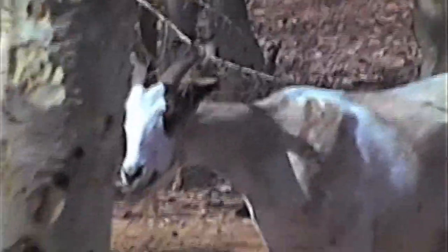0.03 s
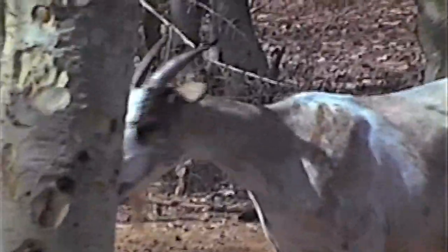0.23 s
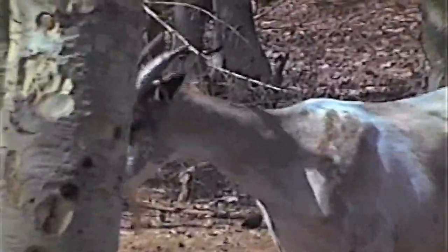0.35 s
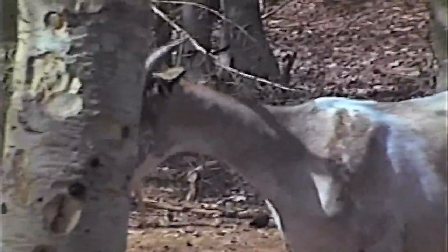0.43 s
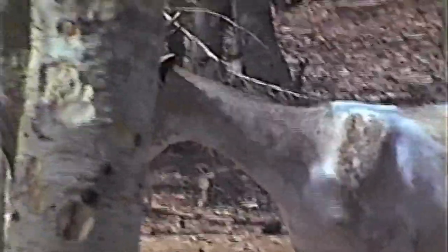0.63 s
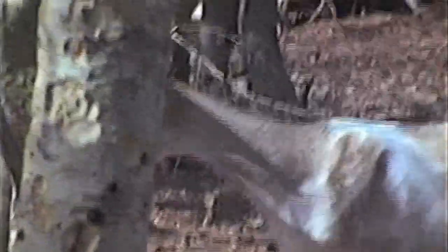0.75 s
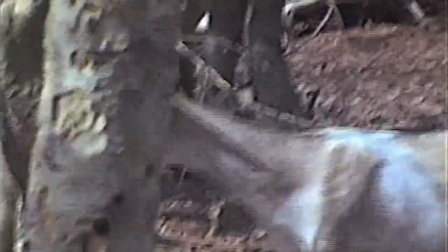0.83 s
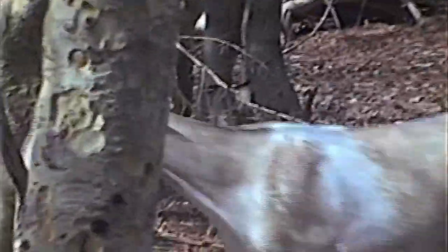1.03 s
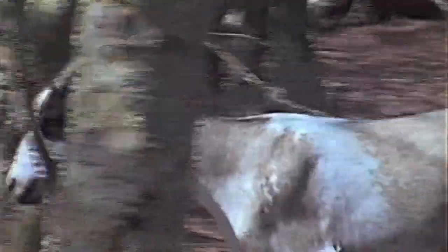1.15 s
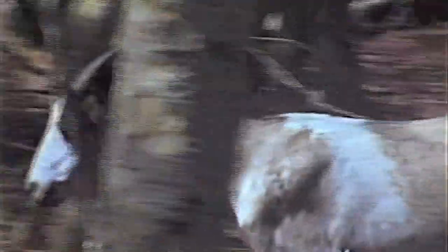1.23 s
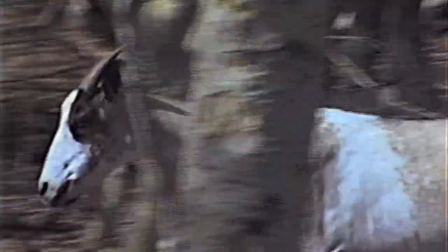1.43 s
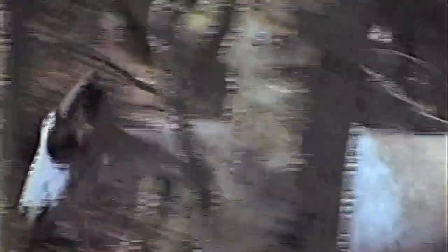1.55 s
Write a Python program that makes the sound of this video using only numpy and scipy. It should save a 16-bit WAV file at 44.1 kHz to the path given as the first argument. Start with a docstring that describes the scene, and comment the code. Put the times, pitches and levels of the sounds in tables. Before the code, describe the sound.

A goat gives one quavering, raspy bleat from about 0.1 to 0.8 seconds, in seven pulsing throbs with creaks between, loudest around 0.45 to 0.6, lightly echoed by trunks and ground. Two tiny dry leaf ticks precede it at 0.03. Soft outdoor air, high insect chirps and a faint rasping trill run throughout; low electrical hum and thin hiss cut out just after 1.0.

```python
"""Faint outdoor air, chirping and rasping insects and a low electrical hum are there from the start.
Two dry leaf ticks come first, then a goat gives one quavering bleat among trees: seven throbs of sharp
vocal pulses with creaks between them. Each throb swells and sags in loudness and pitch together,
while over the whole bleat the mouth opens and shuts once; nearby trunks and ground echo it.
Just after one second the hum and its thin hiss cut out, leaving the air and the insects."""
import sys
import numpy as np
from scipy import signal
from scipy.fft import rfft, irfft
from scipy.io import wavfile

SR = 44100
rng = np.random.default_rng(int(sys.argv[2]) if len(sys.argv) > 2 else 0)


def wav_record(signal):
    """Record a signal, one row per channel, as 16-bit PCM in the file named by sys.argv[1]."""
    frames = np.transpose(np.atleast_2d(signal))
    bounded = np.clip(frames, -1, 1)
    # unit amplitude maps onto the largest positive 16-bit level
    quanta = np.round(bounded * 32767).astype(np.int16)
    wavfile.write(sys.argv[1], SR, quanta)


N = 70560  # samples, 1.6 s
EDGE_HZ = 10900  # upper band limit


def amp(db):
    """Decibels to gain."""
    return 10 ** (np.asarray(db) / 20)


def unit(x):
    """Scales to rms 1."""
    return x / np.sqrt(np.mean(x ** 2) + 1e-20)


def read(points, hz):
    """Reads a table on a log-frequency axis."""
    f, value = np.transpose(points)
    return np.interp(np.log(hz + 1), np.log(f + 1), value)


def add(mix, s, sound):
    """Mixes a sound in at time s, in seconds."""
    part = mix[max(round(s * SR), 0):][:len(sound)]
    part += sound[:len(part)]


def spread(mid, side):
    """Middle and side to left and right."""
    return np.array([mid + side, mid - side])


def noise(colour_db):
    """Noise of rms 1 with a spectrum given as a function of Hz."""
    spectrum = rfft(rng.standard_normal(N))
    return unit(irfft(spectrum * amp(colour_db(np.fft.rfftfreq(N, 1 / SR))), N))


def ring(colour_db, size=1024):
    """Causal minimum-phase response of energy 1 with the given spectrum."""
    log_gain = np.log(amp(colour_db(np.fft.rfftfreq(size, 1 / SR))))
    circle = np.r_[log_gain, log_gain[-2:0:-1]]
    out = np.fft.ifft(np.exp(np.conj(signal.hilbert(circle)))).real
    return out / np.linalg.norm(out)


def hum(left_db=2.0, right_db=-9.5, fade_s=0.0033):
    """Mains hum, a sine stronger on the left, and a thin centred hiss that cut out together."""
    hum_hz, hum_db, hiss_db, end_s = 50.1, -63.5, -67, 1.025
    # colour of the electrical hiss: hz, relative level_db
    hiss_colour = [(30, 22), (100, 6), (200, 8), (500, -2), (5000, -4.5), (9300, -11), (10800, -37)]
    t = np.arange(N) / SR
    sides = amp([[left_db], [right_db]])
    tone = amp(hum_db) * sides * np.sqrt(2) * np.sin(2 * np.pi * hum_hz * t)
    hiss = amp(hiss_db) * noise(lambda hz: read(hiss_colour, hz))
    return (tone + hiss) * np.clip((end_s - t) / fade_s, 0, 1)


def air(air_db=-57):
    """Soft steady outdoor hiss: separate coloured noises for the middle and the sides."""
    # colour of the air: hz, relative level_db
    air_colour = [(30, -52), (100, -20), (170, -18), (240, -4.5), (450, -2.5), (700, -1), (1000, -3),
                  (1550, -6.5), (1850, 0.5), (2250, -6.5), (3300, -12), (4300, -2.5), (4750, -0.5),
                  (5200, -14), (5900, -21.5), (6800, -27), (7500, -54), (11000, -50)]
    # stereo width of the air: hz, side_minus_middle_db
    air_width = [(60, 1), (220, -7), (810, -6), (2990, -2), (11000, -1.5)]
    mid, side = (noise(lambda hz: read(air_colour, hz)) for _ in range(2))
    side = irfft(rfft(side) * amp(read(air_width, np.fft.rfftfreq(N, 1 / SR))), N)
    return amp(air_db) * spread(mid, side)


def insects():
    """Short chirps that bend downward, over a distant rasping trill of quick downward strokes."""
    # chirps of a high insect, about ten a second with one longer gap: centre_s, peak_level_db
    chirp_table = [(0.087, -48), (0.183, -49.5), (0.282, -60), (0.378, -46), (0.769, -51.5), (0.867, -49.5),
                   (0.969, -51.5), (1.065, -54.5), (1.163, -55), (1.261, -60), (1.357, -50.5), (1.451, -51),
                   (1.551, -52)]
    # pitch at the centre; fall and bend are per width and per width squared
    chirp_hz, chirp_slide_hz, chirp_bend_hz, chirp_width_s = 5494, 55, 49.1, 0.0063
    trill_hz, trill_sweep_hz, trill_width_hz = 4440, 234, 67
    strokes_per_s, trill_db = 49, -63

    t = np.arange(N) / SR
    chirps = np.zeros(N)
    for s, db in chirp_table:
        u = (t - s) / chirp_width_s
        hz = chirp_hz - chirp_slide_hz * u - chirp_bend_hz * u ** 2
        chirps += amp(db) * np.exp(-u ** 2 / 2) * np.sin(2 * np.pi * np.cumsum(hz) / SR)

    stroke = t * strokes_per_s % 1
    stroke_hz = trill_hz + trill_sweep_hz * (1 - 2 * stroke)
    # slow noise smears each stroke into a narrow band
    blur = noise(lambda f: -20 * np.log10(1 + (f / trill_width_hz) ** 2))
    trill = np.sin(np.pi * stroke) * blur * np.sin(2 * np.pi * np.cumsum(stroke_hz) / SR)
    return chirps + amp(trill_db) * unit(trill)


def trees(x, wood_db=-18, side_db=-2, size=256):
    """A few close echoes from ground and nearby trunks, then a faint scattered tail."""
    # echoes: delay_s, level_db, side (-1 to 1)
    echoes = [(.0013, -42, 0.16), (.0021, -18, -.15), (.0057, -16, .3)]
    # ring of the trees: hz, t60_s
    wood_ring = [(200, 0.1), (1000, 0.19), (4000, 0.17), (10000, 0.54)]
    near, wide = x.copy(), np.zeros(N)
    for delay, db, pan in echoes:
        add(near, delay, amp(db) * x)
        add(wide, delay, pan * amp(db) * x)

    # half a second of noise, each band dying at its own rate
    hz, t, z = signal.stft(rng.standard_normal((2, SR // 2)), SR, nperseg=size)
    decay = amp(-60 * t / read(wood_ring, hz)[:, None])
    tail = signal.istft(z * decay, SR, nperseg=size)[1]
    mid, side = signal.fftconvolve(x[None], tail / np.linalg.norm(tail[0]), axes=1)[:, :N]
    return spread(near, wide) + amp(wood_db) * spread(mid, amp(side_db) * side)


def leaves(decay_s=0.0012, size=256):
    """Tiny crackles of dry litter: noise bursts that die within milliseconds."""
    # leaf ticks: start_s, level_db (before halving)
    tick_table = [(.027, -55.5), (0.032, -45)]
    # colour of a tick: hz, relative level_db
    leaf_colour = [(1500, -28), (4000, -14), (7500, 14), (10000, -1)]
    out = np.zeros(N)
    for s, db in tick_table:
        crack = rng.standard_normal(size) * np.exp(-np.arange(size) / SR / decay_s)
        add(out, s, amp(db) * np.convolve(crack, ring(lambda hz: read(leaf_colour, hz))) / 2)
    return out


def pulse(s, weak_db, breath, count=24, size=256):
    """One snap of the vocal folds and its puff of air ring the throat."""
    # throat and mouth at each stage: hz, relative level_db
    shut, opening = [(120, -29.5), (240, 10.5), (900, 9.5), (1400, 5.5), (2200, 1.5), (4000, -1.5),
                     (6500, -26), (9500, -16.5), (11000, -45)], [(150, -18), (290, -5), (600, -20), (1000, -7.5), (1450, 3), (1850, -19),
                                   (2400, 5), (2750, -8), (3200, 5.5), (3600, -3), (4000, -2.5),
                                   (4600, -4.5), (5400, -27), (6100, -21.5), (7200, -33), (9500, -31),
                                   (11000, -61)]
    wide_open, closing = [(150, -44.5), (280, -9), (520, -15), (950, -7), (1450, -6), (1750, -8),
                          (2150, -8.5), (2520, 2.5), (2800, 1), (3120, 3), (3500, -3), (4100, 0),
                          (4900, -11.5), (5500, -23), (6200, -26), (7500, -43), (9500, -30.5), (11000, -55)], [(140, -35), (250, -3), (520, -12), (900, 5), (1280, -6), (1520, 3),
                                        (2000, -5.5), (2450, 2), (3050, 3.5), (3600, -1.5), (4600, 0.5),
                                        (5150, -4), (5650, -14), (6300, -13.5), (7000, -21.5), (9500, -21),
                                        (11000, -60)]
    # the mouth opens and shuts once: time_s, stage (0 shut, 1 opening, 2 wide, 3 closing, 4 shut)
    mouth_path = [(.13, 0), (.15, 1), (.37, 1.15), (.44, 1.9), (.6, 2.15), (.64, 3), (.73, 3), (.75, 4)]
    # balance of weak pulses, brighter around 7 kHz: hz, db_per_db_of_weakness
    weak_balance = [(100, 1.08), (500, 0.9), (1500, 1.07), (4000, 1), (7000, 1.87), (10000, 1.05)]
    # colour of the puff: hz, relative level_db
    breath_colour = [(200, -26), (900, -18), (2000, -9), (3300, -2), (5000, 1), (8000, 1)]
    puff_s, ripple_db = .004, .5  # decay of the puff; random change of colour per pulse

    shapes = [shut, opening, wide_open, closing, shut]
    stage = np.interp(s, *np.transpose(mouth_path))
    shares = np.maximum(1 - abs(stage - np.arange(len(shapes))), 0)
    ripple = np.c_[np.linspace(0, EDGE_HZ, count), ripple_db * rng.standard_normal(count)]

    def throat_db(hz):
        """Blend of the two nearest mouth shapes, brightened by weakness and rippled."""
        mouth = sum(share * read(shape, hz) for share, shape in zip(shares, shapes))
        return mouth + weak_db * read(weak_balance, hz) + read(ripple, hz)

    throat = ring(throat_db)
    puff = rng.standard_normal(size) * np.exp(-np.arange(size) / SR / puff_s)
    puff = np.convolve(puff, ring(lambda hz: read(breath_colour, hz)))[:size]
    source = signal.unit_impulse(size) + 2 * breath * puff / np.linalg.norm(puff)
    return np.convolve(source, throat)


def throb(crest, db, top_hz, rise, fall, sag_before, sag_after, flatness, jitter, breath, count=18):
    """A run of pulses loudest at the crest, their spacing widening away from it on either side."""
    drop_db, crest_shape = 13, 1.46  # loss one rise or fall time from the crest, and its curve
    reach = 1.5  # rise or fall times that a throb lasts
    fall_brighter = 0.37  # pulses turn brighter after the crest than before it
    shimmer_db = .5  # random level change per pulse
    out = np.zeros(N)
    # backward, then forward from the crest; forward spacing is 4 % tighter
    for way, span, sag in (-1, rise, sag_before), (0.96, fall, sag_after):
        t = 0
        for k, (slip, shimmer) in enumerate(rng.standard_normal((count, 2))):
            away = abs(t) / span
            weak_db = drop_db * min(away, reach) ** crest_shape
            snap = pulse(crest + t, weak_db * (1 + way * fall_brighter), breath)
            # the crest pulse itself sounds only on the forward pass
            if away < reach and (k or way > 0):
                start_s = crest + t + slip * jitter / top_hz
                add(out, start_s, amp(db - weak_db + shimmer_db * shimmer) * snap)
            # the spacing grows with distance from the crest, taken half a period on
            middle = min(away + .5 / top_hz / span, reach)
            t += way * (1 + sag * middle ** flatness) / top_hz
    return out


def goat(voice_db=4):
    """The bleat: throbs of vocal pulses, with lone weak pulses creaking between them."""
    # throbs: crest_s, level_db (before the voice gain), nominal top_pitch_hz, rise_s, fall_s,
    # sag_before and sag_after (share of the period), flatness of the pitch arch,
    # jitter (share of the period), breath (0 to 1)
    throb_table = [(0.1243, -39, 247.3, 0.0265, 0.022, 0.034, 0.22, 1.5, 0.01, 0),
                   (0.237, -24.5, 319, 0.02, 0.033, 0.28, 0.14, 2, .07, 0.06),
                   (.3550, -19.5, 295.1, 0.026, .016, 0.19, .13, 1.2, 0, 0.54),
                   (0.4566, -11, 331.1, .022, 0.026, .22, 0.26, 1.3, 0.1, 0.25),
                   (0.571, -11.5, 281.5, 0.032, .023, .13, 0.33, 2.2, 0.01, 0.31),
                   (0.6831, -17.5, 248.1, 0.036, .033, 0.21, 0.31, 4.36, .002, 0.27),
                   (.7560, -35.5, 237.2, 0.039, 0.036, 0.11, 0.21, 1.06, 0.06, 0.23)]
    # creaks: start_s, level_db (before the voice gain)
    creak_table = [(0.141, -42), (.1530, -37), (0.2802, -28.5), (.2996, -36), (0.3065, -31), (.3140, -29),
                   (.3881, -30), (0.4987, -28.5), (0.5042, -26), (0.6358, -29.5), (0.732, -28.5)]
    creak_weak_db, creak_breath = 17.5, 0.4
    voice = sum(throb(*row) for row in throb_table)
    for s, db in creak_table:
        add(voice, s, amp(db) * pulse(s, creak_weak_db, creak_breath))
    return 2 * amp(voice_db) * voice


def scene():
    """The goat and leaves among the trees, over the quiet background."""
    return trees(goat() + leaves()) + air() + insects() + hum()


def record(dry):
    """The recorder rounds off the loudest peaks softly, then limits the band."""
    overload = 0.34  # ceiling of the rounded peaks
    rounded = overload * np.tanh(dry / overload)
    lowpass = signal.firwin(255, EDGE_HZ, window=("kaiser", 9), fs=SR)
    return signal.oaconvolve(rounded, lowpass[None], "same")


dry = scene()
out = record(dry)
wav_record(out)
```